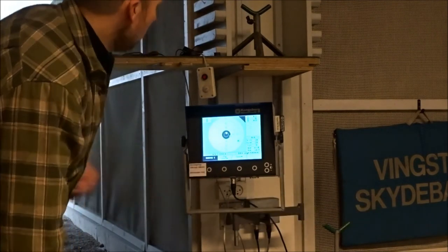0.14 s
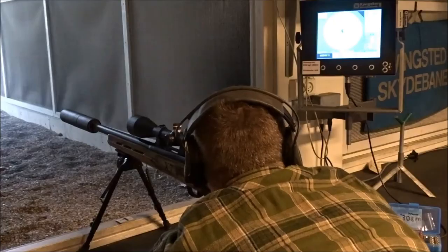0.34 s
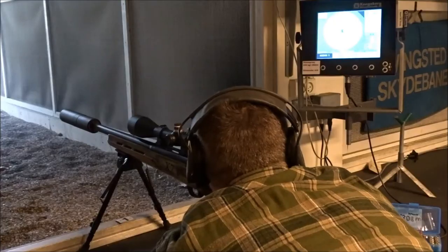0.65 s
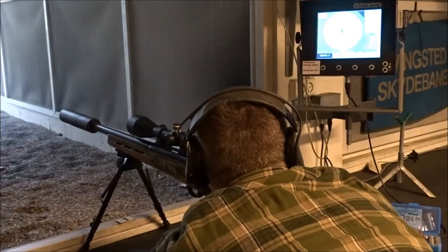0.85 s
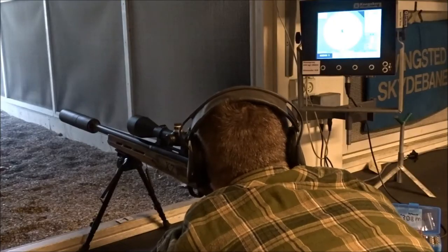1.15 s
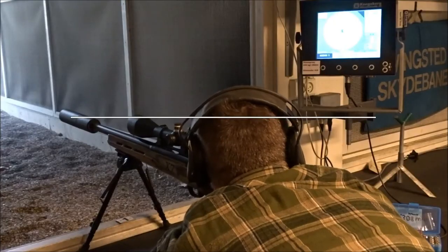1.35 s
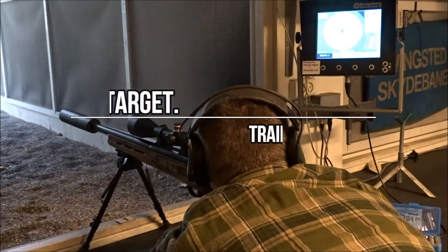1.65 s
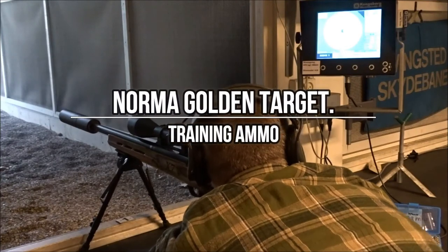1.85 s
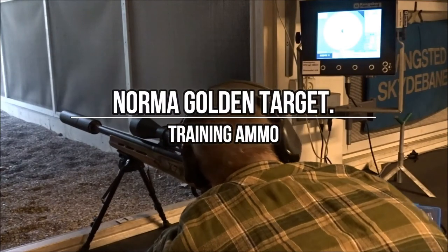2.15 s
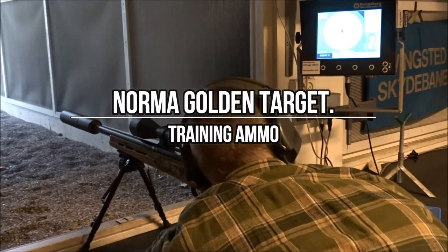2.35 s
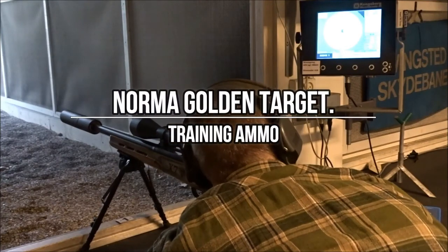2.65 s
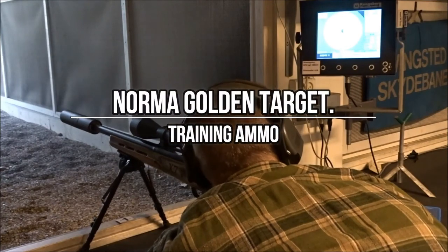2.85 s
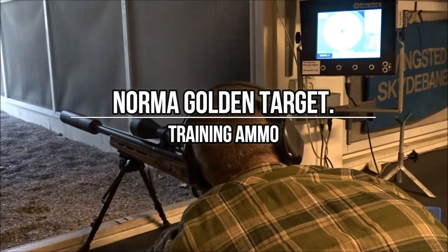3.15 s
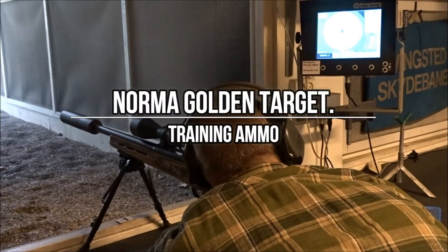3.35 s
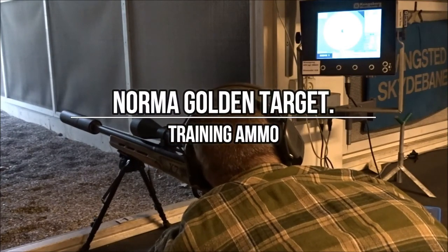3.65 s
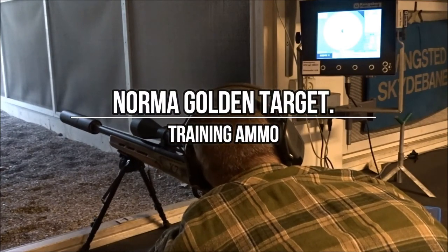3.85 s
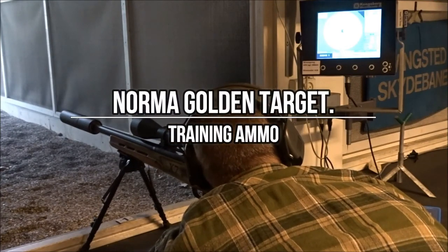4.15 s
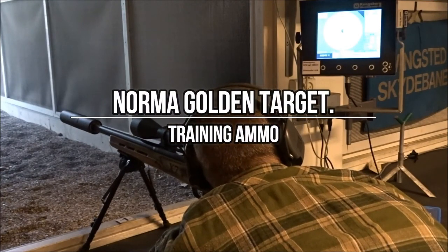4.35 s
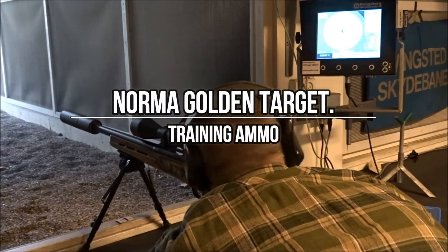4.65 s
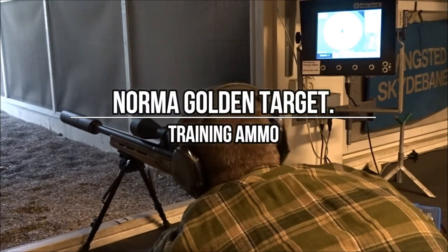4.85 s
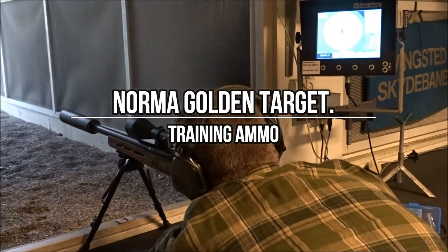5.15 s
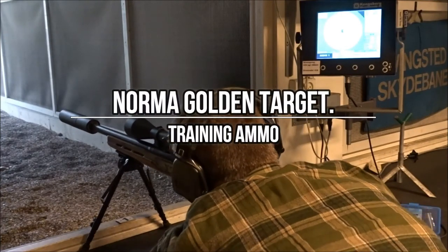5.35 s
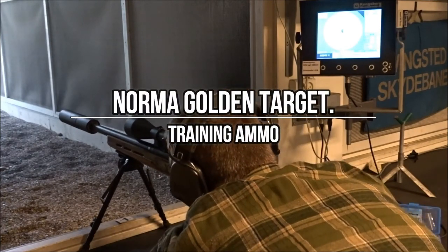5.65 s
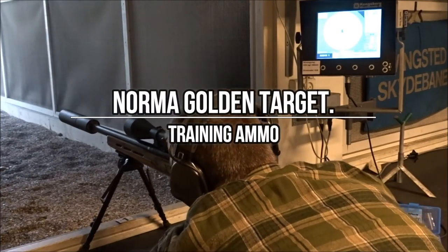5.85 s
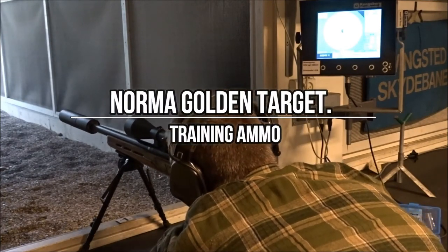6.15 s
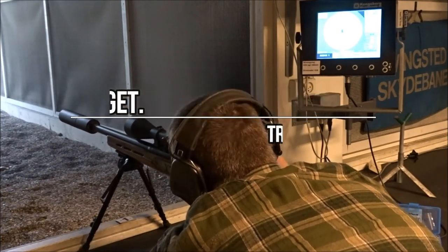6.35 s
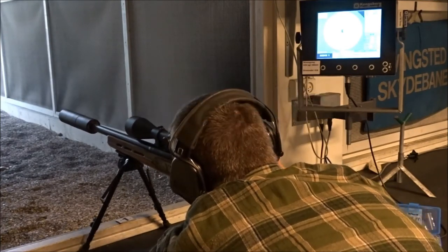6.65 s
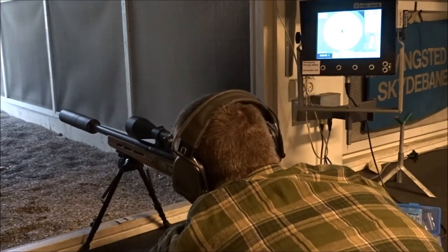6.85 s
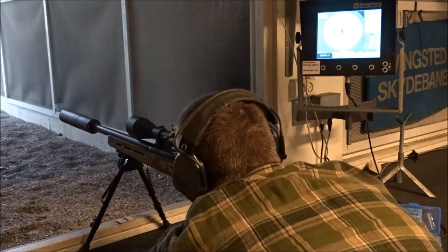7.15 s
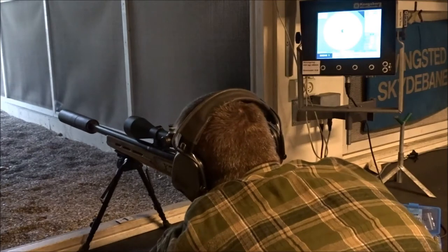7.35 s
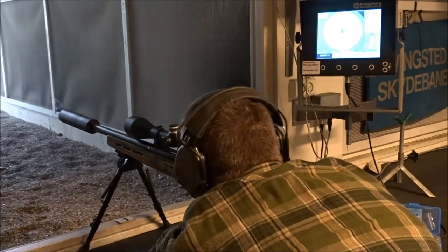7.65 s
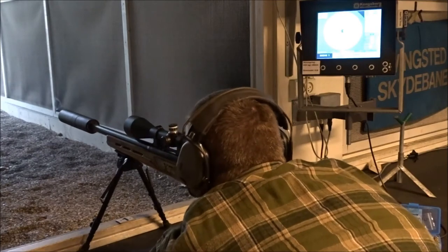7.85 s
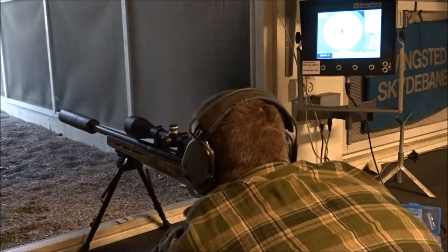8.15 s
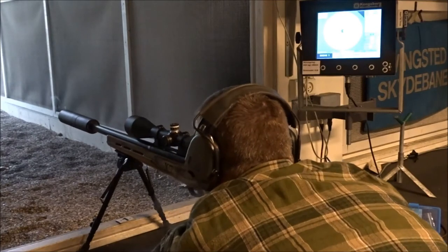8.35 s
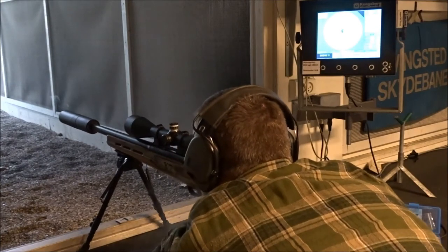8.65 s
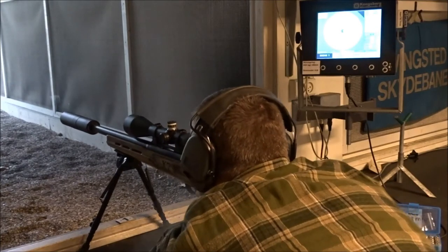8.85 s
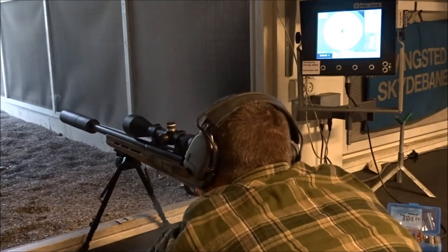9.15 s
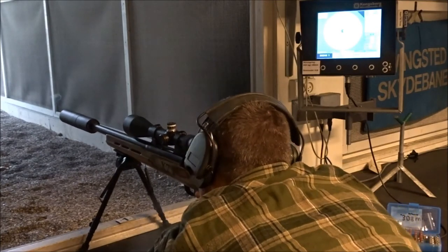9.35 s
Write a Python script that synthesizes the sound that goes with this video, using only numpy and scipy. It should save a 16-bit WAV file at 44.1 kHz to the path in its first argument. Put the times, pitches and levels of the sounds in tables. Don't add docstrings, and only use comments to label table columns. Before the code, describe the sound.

A close stereo microphone in a small shed, with faint room air, hiss and a low purring electrical pulse throughout. Cloth brushes softly at 0-0.15 s and again just before an abrupt scene change at 0.36 s. At 0.65-0.7 s small metal clicks unlock a rifle bolt. From 1.05 to 1.4 s it is drawn back in loud, sharp clacks with short scrapes; a thin high brass ring follows, and at 1.66 s the case drops with a woody thud. Quiet until 5.2 s, with light ticks at 2.8, 3.5 and 3.9-4.6. From 5.35 s gritty steel sliding and small clacks build, with a hard slam at 5.83 and scraping to 6.0. A clack at 6.35, then a dense run from 6.6, slamming at 6.75 and locking at 6.88. Sharp clicks at 7.29 and a loud snap at 7.45, a soft click at 7.6, then faint handling taps at 8.4-9.2 and quiet air to about 9.5.

```python
import sys
import numpy as np
from scipy import signal
from scipy.fft import rfft, irfft, next_fast_len
from scipy.io import wavfile
from scipy.ndimage import uniform_filter1d, map_coordinates

SR = 44100
rng = np.random.default_rng(int(sys.argv[2]) if len(sys.argv) > 2 else 0)


def master_out(mix):
    frames = np.transpose(np.atleast_2d(mix))
    ceiling = np.clip(frames, -1, 1)
    pcm = np.round(ceiling * 32767).astype(np.int16)
    wavfile.write(sys.argv[1], SR, pcm)


def nominal_scale(level):
    x = np.asarray(level, float) / 20
    return 10 ** x


N = 418509

# (frequency [Hz], likeness [0-1])
ALIKE = [(60, 0.65), (130, 0.94), (290, 0.93), (640, 0.86), (1410, 0.71), (3100, 0.78), (6820, 0.22),
         (15000, 0.0095)]
STOCK_HZ, CHAMBER_HZ, RECEIVER_HZ, LUGS_HZ = 696, 828, 1110, 1234
GUIDE_HZ, SPRING_HZ = 2760, 6580


def unit(x):
    return x / np.sqrt(np.mean(x ** 2) + 1e-20)


def along(points, hz):
    f, v = np.transpose(points)
    return np.interp(np.log(hz + 1), np.log(f + 1), v)


def levels(tables):
    t = np.arange(N) / SR
    gain = np.zeros(N)
    for table in tables:
        s, db = np.transpose(table)
        gain += nominal_scale(np.interp(t, s, db, -200, -200))
    return gain


def filtered(x, response):
    m = next_fast_len(x.shape[-1] + 2048)
    spectrum = rfft(x, m) * response(np.fft.rfftfreq(m, 1 / SR))
    return irfft(spectrum, m)[..., :x.shape[-1]]


def wobble(rate_hz):
    knots = rng.standard_normal(int(N * rate_hz / SR) + 4)
    return map_coordinates(knots, [np.arange(N) * rate_hz / SR], order=2)


def rush(spectrum, alike):
    def mid_side(hz):
        turn = np.arccos(np.clip(along(alike, hz), -1, 1)) / 2
        return nominal_scale(along(spectrum, hz)) * [np.cos(turn), np.sin(turn)]

    mid, side = filtered(rng.standard_normal((2, N)), mid_side)
    return unit(np.array([mid + side, mid - side]))


def body(modes, scatter_db=0, low_hz=1, high_hz=30000):
    detune = .035
    c, w, db = np.transpose(modes)[:, :, None]
    c = c * (1 + detune * (scatter_db > 0) * rng.standard_normal(c.shape))
    signs = (-1.) ** np.arange(len(modes))[:, None]
    gains = signs * nominal_scale(db + scatter_db * rng.standard_normal(db.shape))

    def response(f):
        edges = (1j * f / (low_hz + 1j * f) * high_hz / (high_hz + 1j * f)) ** 2
        return (gains * 1j * f * w / (c * c - f * f + 1j * f * w)).sum(axis=0) * edges

    return response


def strike(s, t60, groups, db, bite_s=0.00082):
    settle, shorter_db = 1.4, 160
    snap, snap_t60_s = 2.6, .007
    spike, spike_s = 22, .0011
    t = np.arange(2560) / SR
    uneven_db = 2.5 * rng.standard_normal(107).repeat(24)[:len(t)]
    chatter = rng.standard_normal(len(t)) * nominal_scale(uneven_db)
    lasts_s = np.c_[t60] * (1 + max(db) / shorter_db)
    decay = nominal_scale(-60 * (t / lasts_s) ** settle) + snap * nominal_scale(-60 * t / snap_t60_s)
    force = chatter * decay * (1 - np.exp(-t / np.c_[bite_s]))
    force = force + spike * nominal_scale(.3 * max(db)) * (np.arange(len(t)) == round(spike_s * SR))
    rings = filtered(force, lambda f: np.array([group(f) for group in groups]))
    sound = nominal_scale(np.array(db)) @ (rings / np.abs(rings).max(axis=1, keepdims=True))
    start = round(s * SR)
    return slice(start, start + len(t)), sound


def spells(rows, rise_db_s, fall_db_s):
    t, gain = np.arange(N) / SR, np.zeros(N)
    for s, length_s, start_db, end_db in rows:
        near = slice(round((s - .1) * SR), round((s + .4) * SR))
        u = t[near] - s
        drift_db = np.interp(u, [0, length_s], [start_db, end_db])
        rise_db = rise_db_s * np.minimum(u, 0)
        fall_db = fall_db_s * np.maximum(u - length_s, 0)
        gain[near] += nominal_scale(drift_db + rise_db - fall_db)
    return gain


def note(hz, jitter, flutter_db):
    phase = 2 * np.pi * hz * np.arange(N) / SR + jitter * wobble(190) + 7 * wobble(9)
    return nominal_scale(flutter_db * wobble(120)) * np.sin(phase)


def camera_gain():
    # (time [s], level [dB])
    gain_takes = [
        [(0.0, -49), (0.162, -48), (0.354, -51)],
        [(0.36, -52.5), (1.25, -51), (1.48, -57), (1.65, -57), (1.86, -53.5), (2.06, -55), (2.67, -56.5),
         (3.28, -56.5), (4.2, -54), (4.45, -52.5), (5.78, -49), (6.44, -50), (6.89, -48), (8.1, -49),
         (9.49, -49)],
    ]
    return levels(gain_takes)


def purr():
    # (frequency [Hz], level [dB])
    purr_spectrum = [(50, -50), (85, -5), (110, -9.5), (185, 2), (290, -7.5), (350, -6), (430, -15),
                     (900, -92)]
    frame_s, first_s, cut_s = .04, .018, .356
    times = first_s + frame_s * np.arange(int(N / SR / frame_s))
    first_take = times < cut_s
    sign = -(-1.) ** np.arange(len(times)) * np.where(first_take, -1, 1)
    places = ((times - .0025 * first_take) * SR).astype(int)
    pulses = np.zeros(N)
    pulses[places] = sign * nominal_scale(rng.normal(0, 1.4, len(times)))
    return unit(filtered(pulses, lambda hz: nominal_scale(along(purr_spectrum, hz))))


def room_air():
    # (frequency [Hz], level [dB per Hz])
    air_spectrum = [(12, -47), (28, -20.5), (70, -9), (140, -4), (360, -14.5), (430, -19.5), (6000, -37.5),
                    (15600, -63)]
    # (frequency [Hz], gain [dB])
    hiss_top = [(6000, 0), (8500, 4), (11000, 2), (15600, -1)]
    share = [(60, 0.5), (120, -7.0), (350, 0.5), (600, 3.0)]  # (Hz, dB)
    return filtered(rush(air_spectrum, ALIKE), lambda hz: nominal_scale(along(share, hz) + along(hiss_top, hz)))


def sleeve():
    # (time [s], level [dB])
    brush_levels = [
        (0.0, -41.5),
        (0.03, -45.5),
        (0.134, -46),
        (0.144, -59),
        (0.246, -56),
        (0.352, -48),
        (0.356, -52),
    ]
    # (frequency [Hz], level [dB per Hz])
    cloth_spectrum = [(240, -32), (400, -33), (464, -10.5), (793, -16), (1200, -14), (3560, -20.5),
                      (8570, -27.5), (14000, -55.5)]
    return levels([brush_levels]) * rush(cloth_spectrum, ALIKE)


def knocks():
    # (time [s], peak level [dB], hollow level [dB], bright level [dB], leading steel mode [Hz])
    on_stock = [(0.7064, -29.5, -7.5, -13, 1720), (1.7315, -34.5, 5, -40, 1200),
                (1.8695, -60.5, 18.5, -18, 1590), (2.0592, -38, -0.5, -22, 2400),
                (3.5465, -29.5, -8, -45, 2010), (3.9245, -43.5, -7, -26, 1670),
                (4.2063, -43, -7, -18, 1680), (4.3784, -54, 8, -20, 2570), (4.584, -55, 19, -18, 1670),
                (4.5945, -39.5, 7, -14, 1680), (4.396, -47, -2, -25, 2500), (8.622, -45, -2, -24, 2500),
                (9.148, -47.5, 4.5, -25, 1500), (9.201, -45.5, 7, -26, 1500),
                (8.4311, -35.5, -14, -16, 2060)]
    on_chamber = [(0.636, -44, -7, -26, 3010), (0.7128, -23.5, -14, -20, 2640),
                  (1.0907, -1, -13.5, -13.5, 3070), (1.1915, -23.5, -10.5, -33, 2750),
                  (1.327, -5.5, -2.5, -6, 2000), (1.3735, -3.5, -6, -4.5, 2500),
                  (5.595, -28.5, -5, -32, 2570), (5.617, -23.5, -15, -22, 1600),
                  (5.8345, -4, -1, -15.5, 2500), (5.8683, -23, 7, -12, 1530), (5.8915, -24, 8, -22, 1550),
                  (5.912, -14.5, -3.5, -21, 2660), (5.937, -19.5, 2, -21, 2790),
                  (6.002, -22, -11, -17, 1600), (6.0068, -15, -9, -20, 2800),
                  (6.3528, -13, -13.5, -18, 2450), (6.5769, -30.5, -5, -15, 2100),
                  (6.6125, -15, -11, -26, 2920), (6.6883, -14.5, -9, -12.5, 1610),
                  (6.7258, -10, -8.5, -19, 1860), (3.878, -59, 5, -25, 1700), (4.281, -51, 5, -23, 2000),
                  (8.7334, -43, -3, -14, 2330), (8.765, -34, -14, -23, 1780)]
    on_receiver = [(1.0481, -31, -2, -7, 2800), (1.076, -8, -11.5, -11, 2907),
                   (1.2605, -30.5, -7, -38, 1920), (1.284, -28, 2, -25, 2670),
                   (1.3076, -18.5, -10.5, -10, 2270), (1.359, -4, -8, -5, 2890),
                   (1.661, -20.5, 7, -25, 2920), (1.6705, -24.5, -16, -15, 2420),
                   (1.7447, -32.5, 0, -11, 2120), (3.9958, -47.5, 1.5, -23.5, 1700),
                   (4.566, -42, -7, -18, 1690), (5.1797, -33.5, -46, -9.5, 1870),
                   (5.351, -28, -4.5, -5, 2190), (5.377, -32, -30, -1, 3030),
                           (5.5303, -38.5, 8.5, -30, 1560), (5.676, -31, -0.5, -31, 1450),
                           (5.722, -28, -8, -32, 2530), (5.767, -31.5, 2.5, -7, 2070),
                           (5.828, -18.5, -38, -19, 1950), (6.7647, -8.5, -2, -14, 2380),
                           (6.854, -21, 0.5, -10, 1640), (7.073, -38.5, 4, -29, 3210),
                           (7.0996, -30.5, -4, -31, 1880), (7.2559, -26.5, -1.5, -4, 1970),
                           (7.2836, -21, -3, -3.5, 2770), (7.2947, -11, -7, -16, 2240),
                           (7.4458, -24, -5, -26, 1920), (7.4518, -1, -15, -19, 1820),
                           (8.4193, -42, -4, -32, 1449), (8.505, -39, 1.5, -25, 1500),
                           (8.518, -31.5, -4.5, -20, 3180)]
    on_lugs = [
        (0.6507, -29, -8.5, -38, 2500),
        (2.8236, -46.5, 0.5, -6.5, 4500),
        (5.7448, -18.5, -8.5, -26, 1457),
        (6.7104, -20, -8, -10, 3200),
        (6.7545, -3, -3, -14, 2790),
        (6.789, -10, -6, -20, 1730),
        (6.8797, -5.5, -10.5, -15.5, 2600),
        (7.6223, -31, -3, -34, 3050),
    ]
    # (centre [Hz], width [Hz], level [dB])
    steel_modes = [(1176, 200, -4), (1700, 440, 1), (2070, 790, -1), (2557, 300, -5), (2937, 260, 0),
                   (3300, 990, -2.5), (3996, 500, -3.5), (4510, 700, -5)]
    bright_modes = [(5560, 1000, -8), (6485, 440, 2), (7580, 600, -3.5), (8800, 1200, -5),
                    (12300, 500, -40)]
    bites_s = [.0009, .0012, .0022]
    t60s_s = [.056, .034, .05]
    loaded_s, edge_hz, edge_wide_hz = 5, 12300, 2200
    edge_empty_db, edge_loaded_db = -8, -28
    lead_db_octave = 5
    spots = [(on_stock, STOCK_HZ), (on_chamber, CHAMBER_HZ),
             (on_receiver, RECEIVER_HZ), (on_lugs, LUGS_HZ)]
    out = np.zeros(N + SR)
    for rows, hollow_hz in spots:
        hollow = [(0.86 * hollow_hz, 200, -8), (hollow_hz, 190, 0), (1.218 * hollow_hz, 200, -7)]
        for s, db, hollow_db, bright_db, lead_hz in rows:
            steel = [(c, w, level - lead_db_octave * abs(np.log2(c / lead_hz)))
                     for c, w, level in steel_modes]
            edge_db = edge_empty_db if s < loaded_s else edge_loaded_db
            bright = bright_modes + [(edge_hz, edge_wide_hz, edge_db)]
            groups = [body(steel, 2, low_hz=900, high_hz=6000),
                      body(hollow, low_hz=400, high_hz=3000),
                      body(bright, 2, low_hz=3000)]
            peaks_db = [db - 3.0, db + hollow_db - 4.0, db + bright_db + 5.0]
            place, sound = strike(s, t60s_s, groups, peaks_db, bites_s)
            out[place] += sound
    return out[:N]


def slides():
    # (start [s], length [s], start level [dB], end level [dB])
    strokes = [(1.05, 0.019, -55, -37), (1.075, 0.029, -22.5, -22), (1.122, 0.029, -48, -58),
               (1.282, 0.019, -34, -32), (1.308, 0.022, -29, -22.5), (1.335, 0.04, -23, -18),
               (1.395, 0.032, -35, -42.5), (5.352, 0.015, -27.5, -34.5), (5.376, 0.055, -37.5, -32.5),
               (5.44, 0.085, -48, -59), (5.53, 0.053, -42, -52), (0.637, .03, -53, -56),
               (0.71, .02, -40, -48), (4.57, 0.044, -56, -53), (8.503, 0.032, -52, -53),
               (8.77, .02, -56, -56), (6.19, .05, -59, -61), (5.596, 0.014, -40, -36),
               (5.617, 0.019, -34.5, -37), (5.68, 0.024, -34, -48), (5.725, 0.087, -36.5, -33),
               (5.85, .012, -39, -47), (5.865, .095, -34, -36), (6.01, 0.022, -25, -32.5),
               (6.357, 0.026, -27, -38.5), (6.384, 0.033, -40, -39.5), (6.58, 0.008, -42, -41),
               (6.595, .015, -50, -48), (6.874, 0.0064, -27, -20), (7.287, .024, -27, -29.5),
               (7.445, .006, -44, -26), (7.456, 0.011, -26.5, -35), (6.616, 0.066, -29.5, -30),
               (6.692, 0.078, -31.5, -30), (6.757, 0.073, -24.5, -28.5), (6.845, 0.017, -36, -32),
               (7.08, 0.036, -44.5, -44)]
    chamber_sings = [(1.326, 0.0076, -21, -18.5), (5.355, 0.11, -56, -55), (5.53, 0.12, -49, -55),
                     (5.79, 0.036, -45, -43), (5.868, 0.012, -27, -40), (5.892, 0.014, -30, -33),
                     (5.918, 0.042, -32, -29), (5.97, 0.016, -38, -50), (6.006, 0.017, -33, -29.5),
                     (6.035, 0.022, -52, -49), (6.187, .028, -48, -41), (6.218, 0.025, -40, -48),
                     (6.364, 0.03, -29, -29), (6.408, 0.017, -28, -42), (6.44, 0.016, -49, -55),
                     (6.626, 0.023, -25.5, -26.5), (6.672, 0.013, -29, -37), (6.694, 0.016, -46, -25),
                     (6.757, 0.063, -32, -35)]
    receiver_sings = [(1.082, 0.0088, -40, -34), (5.354, 0.091, -45, -51), (5.475, 0.064, -57, -50),
                      (5.535, .1, -48, -51), (5.87, 0.074, -37, -36), (6.006, 0.017, -33, -39),
                      (6.586, 0.022, -45.5, -42), (6.757, 0.037, -24.5, -36.5), (6.822, 0.024, -30, -37),
                      (7.078, 0.017, -40, -48)]
    guide_sings = [(5.385, .05, -49, -48), (5.44, 0.07, -45, -59), (5.912, 0.011, -24.5, -33),
                   (5.937, 0.0081, -25, -36), (5.6, .06, -46, -52)]
    spring_sings = [(6.614, 0.027, -33, -47), (6.66, .05, -45, -45), (6.712, 0.022, -27, -32),
                    (6.757, 0.051, -18.5, -42), (5.725, 0.036, -50, -42), (5.77, 0.053, -44, -45),
                    (5.68, .015, -57, -57), (5.532, .015, -57, -66)]
    # (centre [Hz], width [Hz], level [dB])
    rail_modes = [(1580, 92, 0.5), (2070, 30, -5.5), (2274, 90, -1.5), (2670, 70, -4), (2790, 80, -8.5),
                  (3050, 51, -1.5), (3395, 250, -10.5), (2500, 1400, -5)]
    rail_high_modes = [(3850, 1000, 5.5), (4490, 200, 10.5), (4900, 400, 1), (6420, 600, 1.5),
                       (8000, 300, -3.5), (8800, 2000, -13.5), (11690, 1100, -14.5)]
    sing_rise_db_s, sing_fall_db_s = 7000, 1091

    def sing(rows, hz, jitter, flutter_db):
        return spells(rows, sing_rise_db_s, sing_fall_db_s) * note(hz, jitter, flutter_db)

    hits = (rng.random(N) < 10000 / SR) * rng.standard_normal(N)
    grains = unit(hits * nominal_scale(1.5 * rng.exponential(size=N) + 1.6 * wobble(130)))
    scrape = spells(strokes, rise_db_s=3004.5, fall_db_s=800)
    out = filtered(grains * scrape, body(rail_modes, low_hz=904)) * nominal_scale(9.5)
    out += filtered(grains * scrape ** 1.595, body(rail_high_modes, low_hz=2500)) * nominal_scale(15.5)
    out += sing(chamber_sings, CHAMBER_HZ, jitter=.3, flutter_db=2)
    out += sing(receiver_sings, RECEIVER_HZ, jitter=1.05, flutter_db=4.5)
    out += sing(guide_sings, GUIDE_HZ, jitter=.8, flutter_db=3)
    out += sing(spring_sings, SPRING_HZ, jitter=2.6, flutter_db=4)
    return out


def thuds():
    # (time [s], peak level [dB], bench level [dB])
    blows = [(0.706, -32, -5), (1.086, -21.5, -16), (1.326, -24, -26), (1.372, -18.5, -23),
             (1.6595, -10.5, -18.5), (1.732, -23, -21), (1.746, -33, -19.5), (3.543, -36.5, 6.5),
             (4.582, -57, -19), (5.837, -57, -5), (6.752, -13, -32), (6.876, -17.5, -18),
             (7.291, -20, -7.5), (7.453, -17.5, -12), (8.433, -32, -6)]
    # (centre [Hz], width [Hz], level [dB])
    stock_modes = [(300, 130, 0), (400, 110, 2.5), (620, 560, -0.5)]
    bench_modes = [(69.4, 25, 0.013), (129.2, 14, 0.0074)]
    out = np.zeros(N + SR)
    for s, db, low_db in blows:
        groups = [body(stock_modes, 1.5, low_hz=100, high_hz=1500), body(bench_modes, high_hz=800)]
        place, sound = strike(s, [0.024], groups, [db - 1.5, db + low_db + 0.5])
        out[place] += sound
    return out[:N]


def brass_case():
    # (time [s], level [dB], t60 [s])
    case_hits = [
        (1.396, -37, .21),
        (1.664, -50, .6),
    ]
    # (frequency [Hz], level [dB])
    brass_modes = [(8926, 0), (8975, -10), (12100, -23)]
    stops_s = 1.752
    t = np.arange(N) / SR
    ring = sum(nominal_scale(db) * np.sin(2 * np.pi * hz * t) for hz, db in brass_modes)
    swell = sum((t > s) * nominal_scale(db - 60 * np.abs(t - s) / t60_s) for s, db, t60_s in case_hits)
    return ring * uniform_filter1d(swell * (t < stops_s), 100) * nominal_scale(3 * wobble(60))


def shed(x):
    # (frequency [Hz], t60 [s])
    shed_decay = [(200, 0.35), (1000, 0.18), (4000, 0.26), (12000, 0.02)]
    out, span = np.zeros(N + 2 * SR), SR // 6
    for start in range(0, N, span):
        hz, t, z = signal.stft(rng.standard_normal(SR // 2), SR, nperseg=256)
        decay = nominal_scale(-60 * t / along(shed_decay, hz)[:, None])
        tail = signal.istft(z * decay, SR, nperseg=256)[1]
        answer = signal.fftconvolve(x[start:start + span], tail / np.linalg.norm(tail))
        out[start + 200:][:len(answer)] += answer
    return out[:N]


def ports(x):
    # (frequency [Hz], gain [dB])
    capsule = [(40, -17.5), (120, -10.5), (700, 5.5), (8000, -0.5), (10000, -7), (12500, -17.5),
               (14000, -25), (16000, -55)]
    # (frequency [Hz], level [dB])
    spread = [(500, -40), (2000, -31), (4000, -19), (8000, -8), (12000, -6.5)]
    mid = filtered(x, lambda hz: nominal_scale(along(capsule, hz)))
    side = filtered(mid, lambda hz: nominal_scale(along(spread, hz)) * 1j) * (.5 + .8 * wobble(150))
    return np.array([mid + side, mid - side])


def scene():
    background = camera_gain() * (nominal_scale(-1.0) * purr() + nominal_scale(3.0) * room_air())
    cloth = sleeve()
    rifle = knocks() + slides() + thuds() + brass_case()
    return ports(rifle + nominal_scale(-18.5) * shed(rifle)) + background + cloth


def roll_off(x):
    return signal.sosfilt(signal.butter(12, 15700, fs=SR, output="sos"), x)


def record(dry):
    top_hz = 15700
    rounded = dry / (1 + np.abs(dry / .99) ** 8) ** (1 / 8)
    mix = filtered(rounded, lambda hz: hz < top_hz)
    return roll_off(mix)


dry = scene()
out = record(dry)
master_out(out)
```